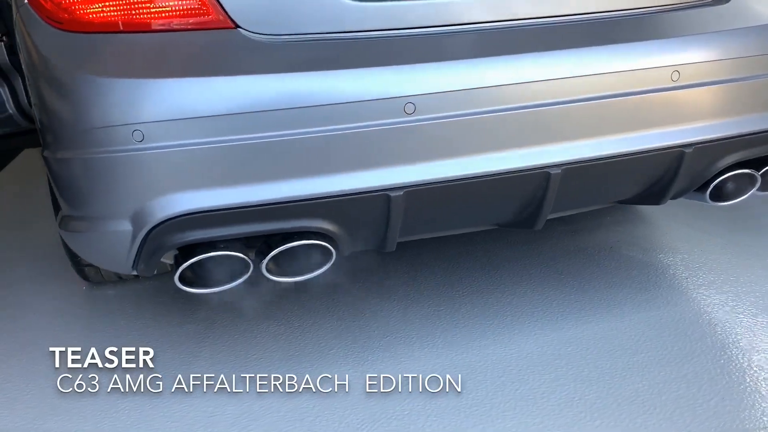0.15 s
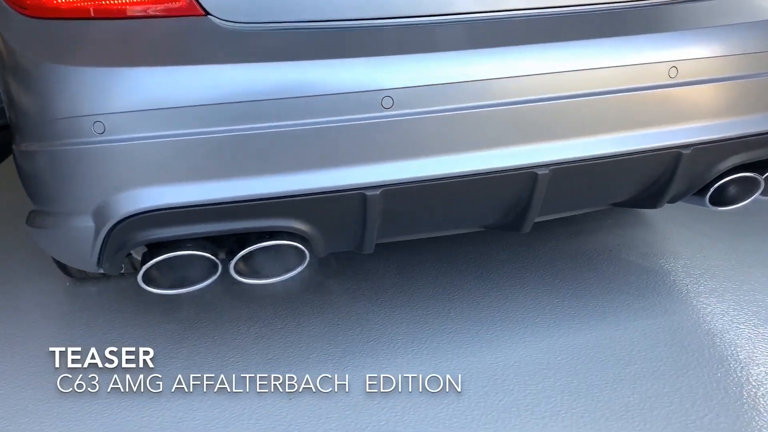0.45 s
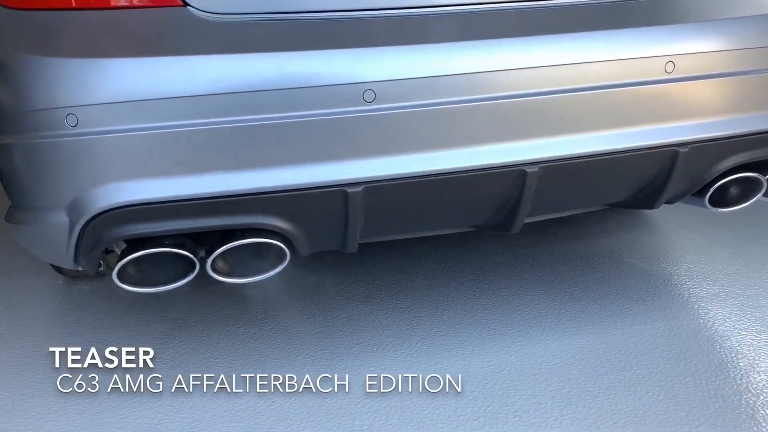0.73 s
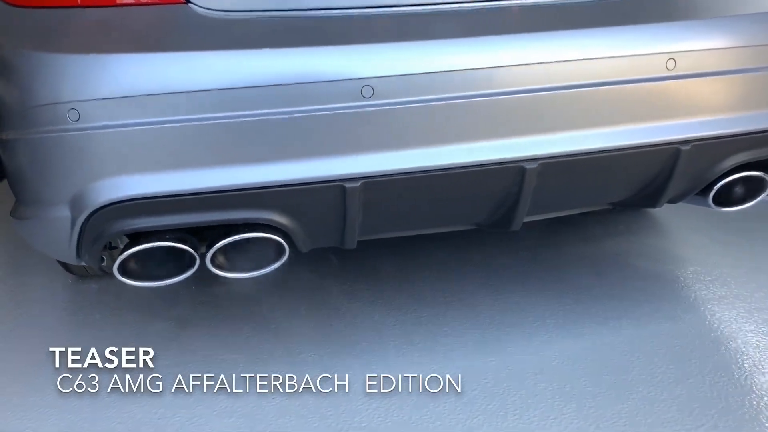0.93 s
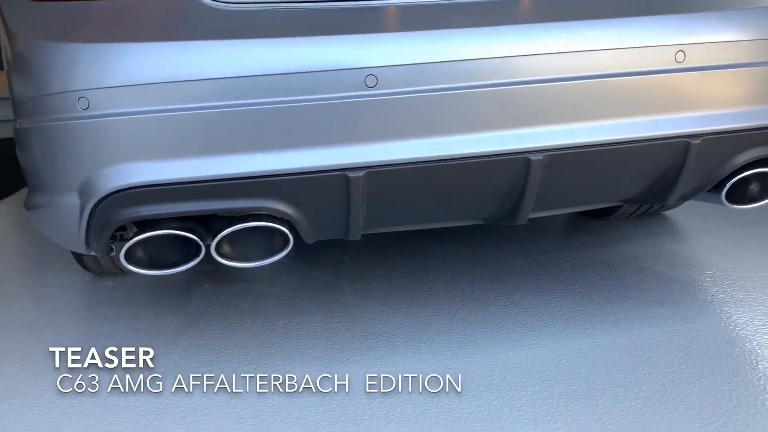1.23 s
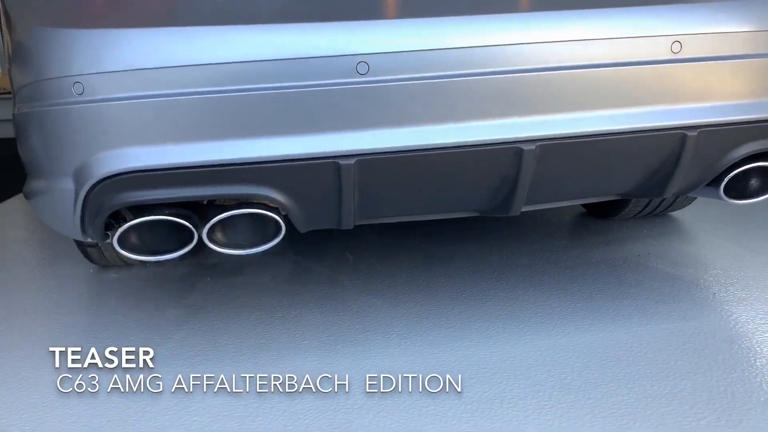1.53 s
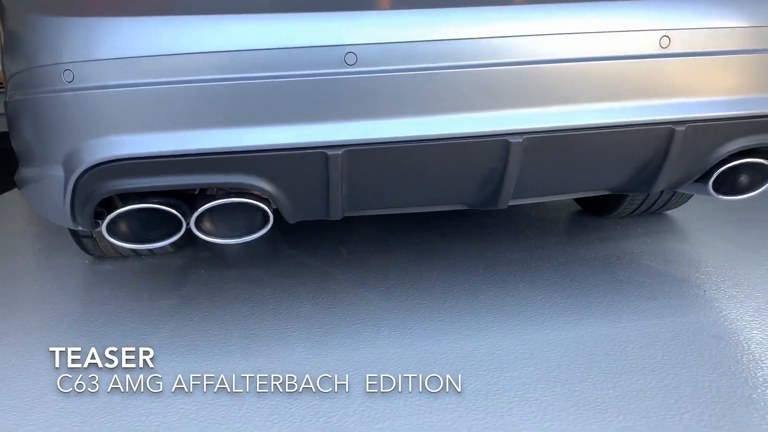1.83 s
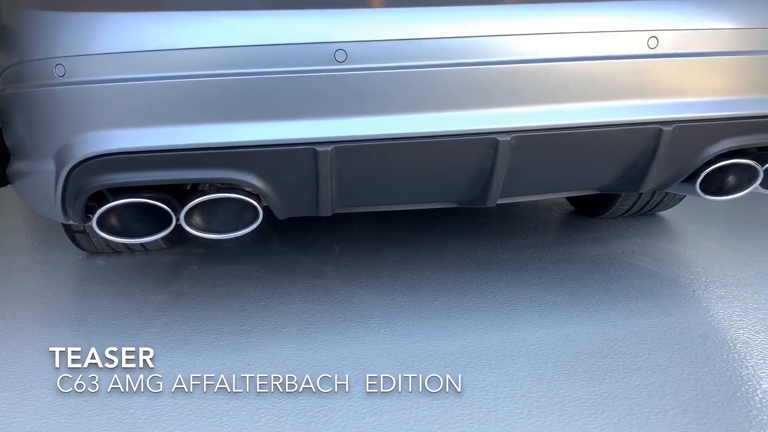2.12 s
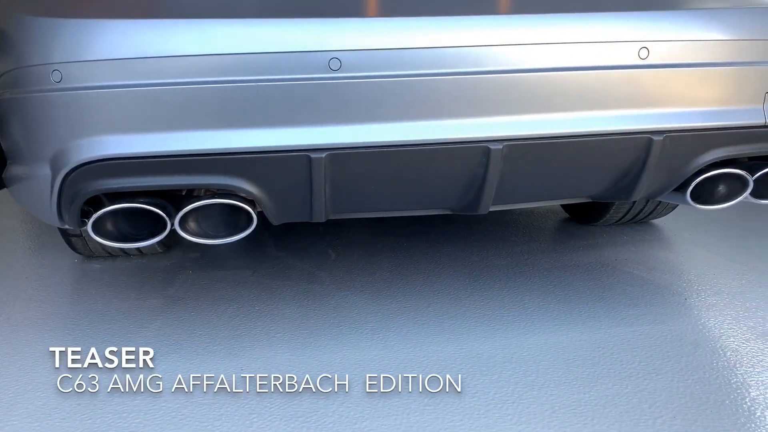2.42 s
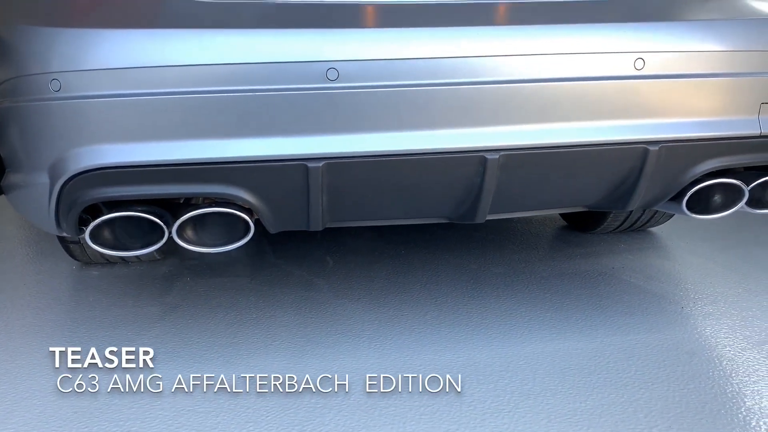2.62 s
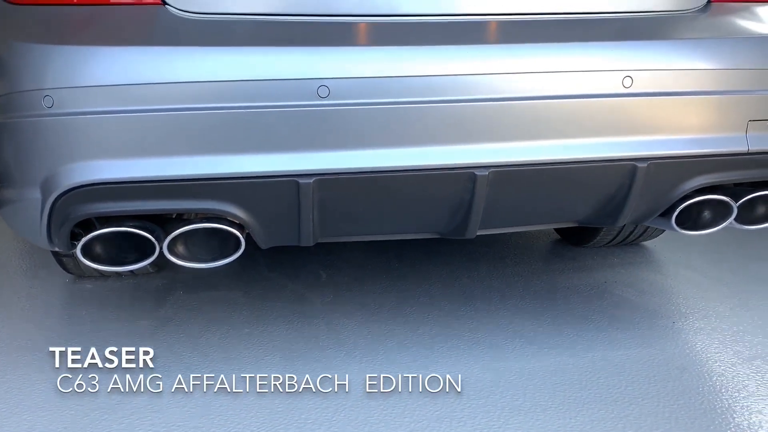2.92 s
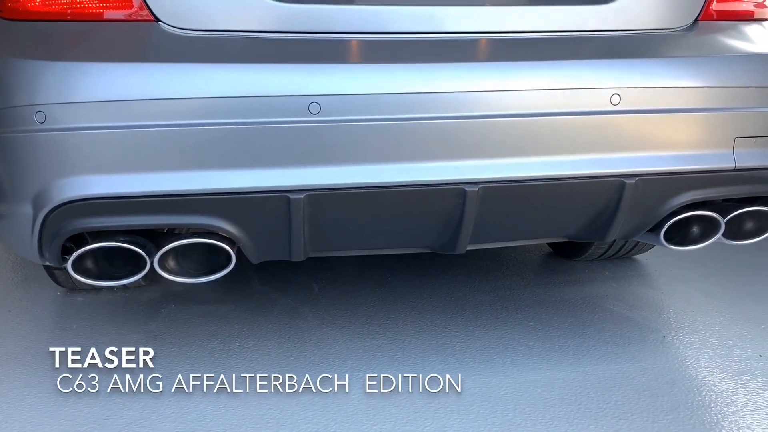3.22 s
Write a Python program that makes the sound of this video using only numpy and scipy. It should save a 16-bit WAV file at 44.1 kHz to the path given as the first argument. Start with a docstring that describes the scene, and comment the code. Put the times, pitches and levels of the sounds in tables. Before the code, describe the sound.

Deep burbling car exhaust heard up close, dropping from a raised idle to a slow, lumpy one.

```python
"""A V8 idles in a garage, heard close to its tailpipes, and settles from a fast idle to a slow one.
Each firing gives a deep boom (three harmonics), a burble (a pulse that rings the pipe) and a puff (gated noise
in the tailpipe's resonances); uneven firing adds a lope, and some puffs sputter or tick (short resonant bursts).
Behind them are low rumble and the hiss of the exhaust flow (filtered noise), and thin wavering sine tones:
a whine, probably a pump, and faint singing, probably in the pipes."""
import sys
import numpy as np
from scipy import signal
from scipy.fft import rfft, irfft
from scipy.io import wavfile

SR = 44100
rng = np.random.default_rng(int(sys.argv[2]) if len(sys.argv) > 2 else 0)


def to_wav(s):
    """Save 16-bit WAV."""
    ch = np.atleast_2d(s).T  # columns
    pcm = np.round(np.clip(ch, -1, 1) * 32767)  # PCM
    wavfile.write(sys.argv[1], SR, pcm.astype(np.int16))


N = 148176
T = np.arange(N) / SR
HZ = np.fft.rfftfreq(N, 1 / SR)


def amp(db):
    """Logarithmic level: decibels to an amplitude gain."""
    return 10 ** (np.asarray(db) / 20)


def unit(x):
    """Normalisation: scales to rms 1."""
    return x / np.sqrt(np.mean(x ** 2) + 1e-20)


def curves(table):
    """Linear interpolation: all columns of a time table at every sample."""
    times, *columns = np.transpose(table)
    return [np.interp(T, times, column) for column in columns]


def read(points):
    """Interpolation over log frequency: a spectrum table at every frequency."""
    hz, value = np.transpose(points)
    return np.interp(np.log(HZ + 1), np.log(hz + 1), value)


def colour(x, points):
    """Minimum-phase filtering: a causal response with the given spectrum; result at rms 1."""
    log_gain = np.log(amp(read(points)))
    circle = np.r_[log_gain, log_gain[-2:0:-1]]
    # the Hilbert transform of the log gain gives the causal phase
    response = np.exp(np.conj(signal.hilbert(circle)))[:len(HZ)]
    return unit(irfft(rfft(x) * response, N))


def drift(rate_hz):
    """Low-passed noise: random motion slower than about rate_hz, rms 1."""
    return unit(irfft(rfft(rng.standard_normal(N)) / (1 + (HZ / rate_hz) ** 4), N))


def ring(hz, width_hz):
    """Resonance: two independent channels of noise in one peak, at half amplitude half a width away."""
    noise = rfft(rng.standard_normal((2, N)))
    return unit(irfft(noise / (1 + (2 * (HZ - hz) / width_hz) ** 2), N))


# engine speed: t/s, firing rate f/Hz
ENGINE_SPEED = [(0, 66.5), (.15, 64.1), (.4, 62.75), (.62, 56.38), (.85, 54.48), (1.1, 52.21), (1.5, 50.48),
                (1.8, 49.88), (2.05, 48.67), (2.35, 48.88), (2.6, 46.95), (2.8, 46.78), (3, 45.96),
                (3.36, 46.8)]
START_FIRINGS, IDLE_HZ = -.22, 50


def engine():
    """Phase is the integral of rate: firing rate, firings so far, and the rate's excess over idle."""
    rate, = curves(ENGINE_SPEED)
    firings = START_FIRINGS + np.cumsum(rate) / SR
    return rate, firings, np.maximum(rate - IDLE_HZ, 0)


# boom's harmonics: t/s, first level/dB, second level/dB, third level/dB
BOOM_HARMONICS = [(0, -15.5, -18.5, -33.5), (.4, -13, -21.5, -32), (.68, -11, -24.5, -31),
                  (1.1, -12, -23, -33), (1.5, -13.5, -24.5, -28), (2.35, -15.5, -26, -25.5),
                  (2.85, -17, -29, -28), (3.36, -17.5, -28, -28.5)]
SKEW_RAD_PER_HZ = .25  # phase step from one harmonic to the next, per Hz above idle
BOOM_WOBBLE = .015  # rms share of amplitude


def boom(firings, excess_hz):
    """Fourier synthesis: the deep pressure wave of the firings as three nearly steady harmonics."""
    wave = 0
    for k, db in enumerate(curves(BOOM_HARMONICS)):
        level = np.sqrt(2) * amp(db) * (1 + BOOM_WOBBLE * drift(41))
        phase = 2 * np.pi * (k + 1) * firings + k * SKEW_RAD_PER_HZ * excess_hz
        wave = wave + level * np.cos(phase)
    return wave


# lines of uneven firing: multiple of the engine cycle rate,
# relative level/dB at the slowest, middle and fast idle
LOPE_LINES = [(5, -58, -51, -31), (6, -45, -50, -40), (7, -46, -56, -39), (9, -48, -56, -46),
              (10, -40, -43, -44), (11, -44, -47, -36), (13, -44, -49, -37), (18, -39, -43, -30),
              (19, -44, -44, -30), (21, -47, -40, -41), (22, -56, -48, -38), (25, -42, -48, -46),
              (27, -52, -56, -33), (29, -56, -56, -38), (32, -58, -58, -35), (34, -56, -56, -38),
              (37, -50, -54, -36), (45, -48, -50, -33), (46, -60, -60, -39), (47, -60, -60, -41),
              (51, -60, -58, -44), (53, -52, -50, -41), (56, -47, -47, -60), (61, -44, -58, -58)]
LOPE_RATES_HZ = (46.8, 49.5, 63)  # firing rates of the three level columns
LOPE_WOBBLE, LOPE_DB = .12, -.7  # rms share of amplitude; gain on every line


def lope(firings, rate):
    """Subharmonics: the banks' uneven firing adds lines between the harmonics, a growl at fast idle, then a lope."""
    cycles = firings / len(CYLINDER_TRAITS)
    wave = 0
    for order, *db in LOPE_LINES:
        level = amp(LOPE_DB + np.interp(rate, LOPE_RATES_HZ, db)) * (1 + LOPE_WOBBLE * drift(8.4))
        wave = wave + level * np.cos(2 * np.pi * (order * cycles + rng.random()))
    return np.sqrt(2) * wave


# one row per cylinder in firing order: burble place in firings,
# relative burble level/dB, puff level/dB, tick level/dB
CYLINDER_TRAITS = [(.63, 1, -2, 3), (1.77, 2, 3.5, -30), (2.68, -3, 3, -28), (3.76, 0, -4, -14),
                   (4.79, .7, -2.5, -6), (5.71, .5, -.5, 0), (6.78, -1, .5, -22), (7.65, -.6, .5, -19)]
# ring of the pipe: f/Hz, relative level/dB
PIPE_SPECTRUM = [(20, -22.5), (60, -17.5), (110, -6), (160, 1), (200, -3), (250, 0), (300, -1), (350, 2.5),
                 (400, -11), (450, -18.5), (700, -30.5), (2000, -55.5)]
BURBLE_SCATTER_DB, PIPE_ROOM_DB = 1.3, -11


def burble(firings):
    """Impulse response: each cylinder's pulse, with its own delay and strength, rings the tailpipe."""
    place, db, _, _ = np.transpose(CYLINDER_TRAITS)
    cycles = np.arange(int(firings[-1] / len(place)) + 1)[:, None]
    at = np.interp(cycles * len(place) + place, firings, np.arange(N)).astype(int)
    strength = amp(db + BURBLE_SCATTER_DB * rng.standard_normal(at.shape))
    pulses = np.zeros(N)
    pulses[at] = strength * (at < N - 1)  # none beyond the end
    pipe = colour(pulses, PIPE_SPECTRUM)
    echo, other_echo = garage(pipe)
    # the second signal is the unrelated part that ports() mixes in
    return np.array([pipe + amp(PIPE_ROOM_DB) * echo, other_echo])


# turbulent rumble: f/Hz, relative level/dB
RUMBLE_SPECTRUM = [(15, -12), (45, -10), (80, 1), (150, 3), (200, -2), (350, -1), (420, -5), (520, -8),
                   (1000, -35)]


def rumble():
    """Flow noise: low turbulence as filtered random noise."""
    return colour(rng.standard_normal((2, N)), RUMBLE_SPECTRUM)


PUFF_SCATTER_DB = 1.9
PUFF_PLACE, PUFF_WIDTH = .546, .26  # in firings


def gate(firings, cylinder_db):
    """Amplitude modulation: one puff per firing, quick to rise and slower to die, scaled by its cylinder."""
    since = firings - PUFF_PLACE + PUFF_WIDTH
    firing = np.floor(since).astype(int)
    scatter = PUFF_SCATTER_DB * rng.standard_normal(firing.max() + 1)
    db = cylinder_db[firing % len(cylinder_db)] + scatter[firing]
    u = since % 1 / PUFF_WIDTH
    return unit(amp(db) * (u * np.exp(-u)) ** 2)


# tailpipe resonances: f/Hz, width f/Hz, relative level/dB
TAILPIPE_MODES = [(715, 420, -3), (1025, 205, -7.5), (1257, 340, -6), (1502, 194, -5.5), (1840, 580, -6.5),
                  (2163, 1270, -2.5)]
PUFF_FLOOR = .16  # power of the gas that flows between puffs, relative to the gate's mean power


def puffs(firings, cylinder_db):
    """Modal excitation: pulsed gas noise drives each resonance with its own scatter, over a steady flow."""
    gas = 0
    for hz, width_hz, db in TAILPIPE_MODES:
        flow = np.sqrt(PUFF_FLOOR + gate(firings, cylinder_db) ** 2)
        gas = gas + amp(db) * flow * ring(hz, width_hz)
    return unit(gas)


TICK_HZ, TICK_WIDTH_HZ = 2030, 110


def ticking(firings, cylinder_db):
    """Gated resonance: a faint metallic band pulses with the firings."""
    return gate(firings, cylinder_db) * ring(TICK_HZ, TICK_WIDTH_HZ)


# hiss: f/Hz, relative level/dB
HISS_SPECTRUM = [(200, -7.5), (500, -7.5), (1300, -10.5), (2100, 0), (3300, -0.5), (4600, -5.5), (5800, -6),
                 (7300, -5), (8800, -4.5), (9500, -4), (10300, -27.5), (12500, -6), (15000, -25.5),
                 (16000, -34.5)]
# hiss as the gas flow eases: t/s, level/dB
GAS_FLOW = [(0, -42), (.55, -42.5), (1.1, -46), (1.6, -48), (2.5, -49.5), (3.36, -50)]


def hiss():
    """Jet noise: broadband noise whose level follows the gas flow."""
    flow_db, = curves(GAS_FLOW)
    return amp(flow_db) * colour(rng.standard_normal((2, N)), HISS_SPECTRUM)


TONE_FLUTTER = .35  # rms share of amplitude


def tones(table, clock):
    """Additive synthesis: thin tones that waver together and flutter separately in level."""
    total = 0
    for hz, left, right in table:
        total = total + amp([[left], [right]]) * (1 + TONE_FLUTTER * drift(24)) * np.sin(hz * clock)
    return np.sqrt(2) * total


# whine at twice the pump's rate: t/s, mean level/dB of the two sides, left minus right level/dB
WHINE_LEVEL = [(0, -58, -6), (.13, -64, -4), (.18, -53.5, -11), (.25, -72, -9), (.33, -60, -10),
               (.38, -61, -17), (.47, -58, -16), (.53, -65, -17), (.6, -62, -6), (.72, -70, -11),
               (.85, -61, -19), (.93, -69, -4), (1, -61, -10), (1.1, -67, -6), (1.18, -64, 3),
               (1.26, -52.5, -.5), (1.36, -69, -8), (1.49, -65.5, -15.5), (1.54, -82, 4), (1.73, -49, -11),
               (1.88, -51.5, -11), (2.07, -73.5, -13), (2.18, -59, -11.5), (2.46, -56.5, -16),
               (2.59, -62, -19), (2.76, -58.5, -26), (2.95, -63, -28.5), (3.13, -65, -9), (3.18, -56, 7),
               (3.23, -73, -.5), (3.28, -65, 22), (3.36, -61, 9)]
PUMP_HZ = 2708
# weaker steady tones: f/Hz, left level/dB, right level/dB
WEAK_TONES = [(2708, -64.5, -70.5), (4644, -68, -73), (8125, -63.5, -64.5)]


def whine(clock):
    """Periodic source: the second harmonic of the pump swells and shifts sides as the listener moves."""
    db, pan = curves(WHINE_LEVEL)
    sides = amp(db + np.array([pan, -pan]) / 2)
    return np.sqrt(2) * sides * np.sin(2 * PUMP_HZ * clock) + tones(WEAK_TONES, clock)


# singing tones: f/Hz, relative left level/dB, relative right level/dB
SINGING_TONES = [(1254, -5, 2), (1696, 2, -1)]
# swell of the singing: t/s, level/dB
SINGING_SWELL = [(0, -58), (1.5, -60), (1.75, -55), (2, -58), (2.15, -54), (2.28, -49.5), (2.36, -51),
                 (2.45, -61), (3.36, -65)]


def singing(clock):
    """Tonal resonance: two faint tones, probably in the pipes, share one swell."""
    swell_db, = curves(SINGING_SWELL)
    return amp(swell_db) * tones(SINGING_TONES, clock)


def burst(start, db, hz, width_hz, rise_s):
    """Transient resonance: noise in one peak swells and dies within a few milliseconds."""
    u = np.clip((T - start) / rise_s, 0, 50)
    shape = u * np.exp(1 - u)
    sound = shape * ring(hz, width_hz)
    # each channel gets the energy of its envelope
    return amp(db) * sound * np.linalg.norm(shape) / np.linalg.norm(sound, axis=1, keepdims=True)


# loud sputters of gas: t/s, level/dB before SPUTTER_DB, f/Hz
GAS_SPUTTERS = [(.0179, -25, 1390), (.0328, -22, 1450), (.1416, -23, 1220), (.1875, -25, 1030),
                (.2673, -25, 1450), (.393, -25, 1280), (.409, -18, 1450), (.4424, -26, 1210),
                (.5247, -25, 1030), (.6664, -26, 1230), (.6853, -24.5, 1040), (.8295, -29, 1040),
                (.8854, -26, 1500), (.9637, -27, 1030), (1.1323, -27, 1300), (1.1912, -30, 1200),
                (1.2875, -28, 1510), (1.5853, -30, 1000), (1.6043, -31, 1290), (1.925, -28, 1300),
                (2.397, -31, 1050)]
SPUTTER_DB, SPUTTER_RISE_S, SPUTTER_WIDTH_HZ = -5.5, .002, 110


def sputters():
    """Transient excitation: single loud puffs as short resonant bursts."""
    return sum(burst(start, db + SPUTTER_DB, hz, SPUTTER_WIDTH_HZ, SPUTTER_RISE_S)
               for start, db, hz in GAS_SPUTTERS)


# loud metallic ticks: t/s, level/dB before TICK_DB, f/Hz
METAL_TICKS = [(1.407, -35, 1980), (1.723, -32, 2030), (1.988, -39, 2060), (2.028, -37, 1960),
               (2.111, -37, 2130), (2.482, -39, 2030), (2.546, -35, 1890), (2.609, -37, 1960),
               (2.713, -34, 2010), (2.821, -39, 2140), (2.886, -36, 1980), (2.994, -37, 2040),
               (3.231, -37, 1990), (3.342, -38, 2020)]
TICK_DB, TICK_RISE_S = -1, .0018


def ticks():
    """Transient excitation: single metallic ticks as short, higher resonant bursts."""
    return sum(burst(start, db + TICK_DB, hz, TICK_WIDTH_HZ, TICK_RISE_S)
               for start, db, hz in METAL_TICKS)


ROOM_T60_S = .35


def garage(x):
    """Reverberation: diffuse echo of the hard floor and walls, one decaying noise tail per channel."""
    t = T[:SR // 2]
    decay = amp(-60 * t / ROOM_T60_S) * (t > .006)  # silent for the first 6 ms
    tail = rng.standard_normal((2, len(t))) * decay
    return signal.fftconvolve(np.atleast_2d(x), tail / np.linalg.norm(tail[0]), axes=1)[:, :N]


# likeness of the two sides: f/Hz, share of amplitude in common
LIKENESS = [(60, .98), (180, .97), (330, .95), (500, .7), (750, .55), (1300, .72), (2000, .42), (3300, .45),
            (5500, .55), (8000, .85), (15000, .8)]
# phase between the sides: f/Hz, phase by which left leads/rad
LEFT_LEAD = [(0, 0), (1460, -0.2), (2580, -3.6), (3100, -3.5), (3360, -3.5), (6980, -12.6), (8180, -12.8),
             (9730, -15.5), (11600, -16.0), (12500, -18.6), (15000, -19.0), (15200, -21.0)]
# balance of the sides: f/Hz, left minus right level/dB
SIDE_TILT = [(60, 6), (110, -8), (200, 0.5), (380, -1), (700, 1.5), (1290, 3.5), (2380, 1.5), (4400, -1),
             (8120, -1), (15000, 0.5)]


def ports(two):
    """Spatial coherence: two close microphones share the first signal; the unrelated second makes them differ."""
    shared, unrelated = rfft(two)
    same = read(LIKENESS)
    right = same * shared + np.sqrt(1 - same ** 2) * unrelated
    right = right * np.exp(-1j * read(LEFT_LEAD))
    side = amp(read(SIDE_TILT) / 2)
    return irfft(np.array([shared * side, right / side]), N)


# exhaust as the load eases: t/s, pipes level/dB, puffs level/dB (before the gains below)
ENGINE_LOAD = [(0, -29.5, -35), (.42, -26.5, -38), (.75, -27, -38.5), (1.1, -29, -42.5), (1.5, -31, -46),
               (2.4, -32.5, -46), (3.36, -32.5, -46.5)]
BURBLE_DB, RUMBLE_DB, PUFFS_DB, TICKING_DB = -1, -8.5, 2, -54
ROOM_DB, BURST_ROOM_DB = -4, -10  # echo of the gas and of the bursts


def exhaust(firings):
    """Superposition: burble, rumble, puffs, bursts and hiss add with the garage's echo; load sets the levels."""
    pipe_gain, puff_gain = amp(curves(ENGINE_LOAD))
    _, _, puff_db, tick_db = np.transpose(CYLINDER_TRAITS)
    pipes = pipe_gain * (amp(BURBLE_DB) * burble(firings) + amp(RUMBLE_DB) * rumble())
    gas = amp(PUFFS_DB) * puff_gain * puffs(firings, puff_db)
    gas += amp(TICKING_DB) * ticking(firings, tick_db)
    bursts = sputters() + ticks()
    echo = garage(amp(ROOM_DB) * gas + amp(BURST_ROOM_DB) * bursts)
    return pipes + gas + bursts + echo + hiss()


LEAD_FIRINGS_PER_HZ = .02  # the gas runs ahead of the boom, per Hz above idle
WAVER = .0008  # rms share of the tones' frequency


def scene():
    """Common clock: engine speed times every exhaust layer; the thin tones share a wavering clock."""
    rate, firings, excess_hz = engine()
    bass = boom(firings, excess_hz) + lope(firings, rate)
    bass = amp([[-.3], [.3]]) * bass  # right slightly louder
    air = ports(exhaust(firings + LEAD_FIRINGS_PER_HZ * excess_hz))
    clock = 2 * np.pi * np.cumsum(1 + WAVER * drift(20)) / SR
    return bass + air + whine(clock) + singing(clock)


EDGE_HZ = 15700


def record(dry):
    """Band limitation: a steep linear-phase low-pass removes the top of the treble."""
    lowpass = signal.firwin(511, EDGE_HZ, window=("kaiser", 9), fs=SR)
    return signal.oaconvolve(dry, lowpass[None], "same")


dry = scene()
out = record(dry)
to_wav(out)
```